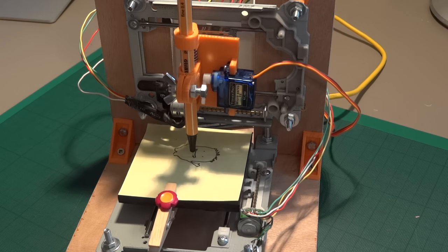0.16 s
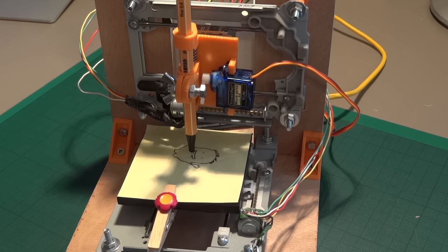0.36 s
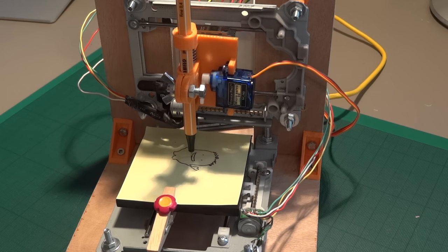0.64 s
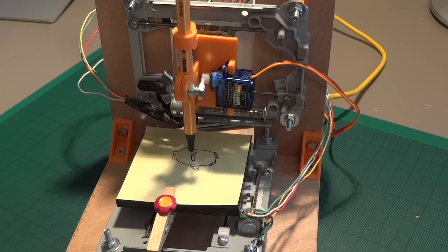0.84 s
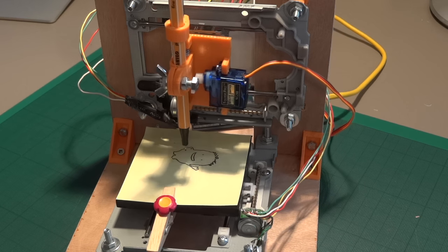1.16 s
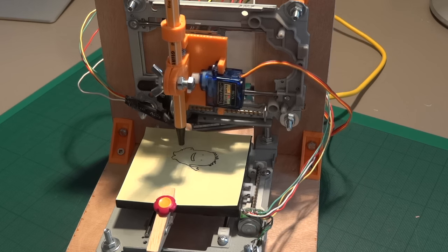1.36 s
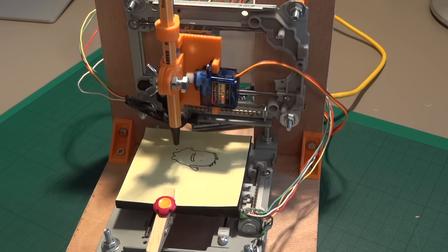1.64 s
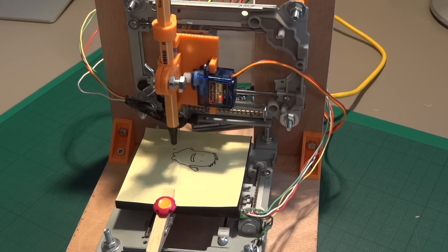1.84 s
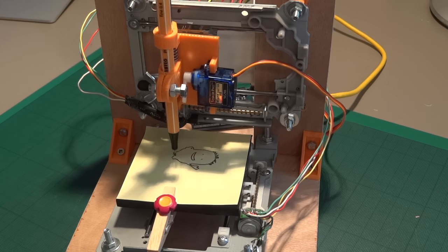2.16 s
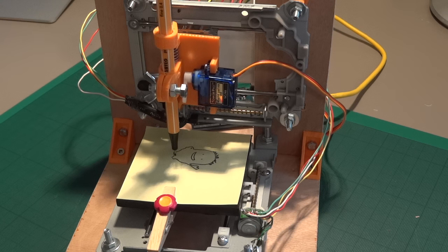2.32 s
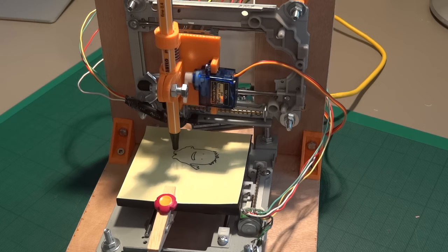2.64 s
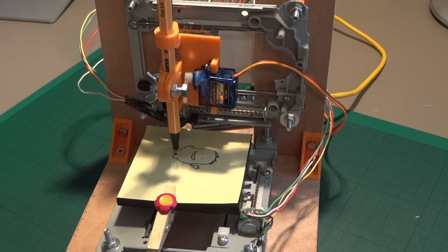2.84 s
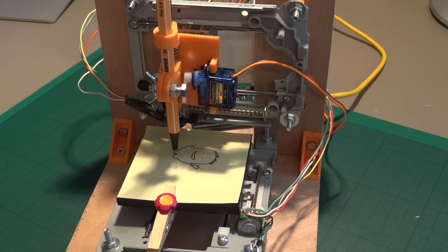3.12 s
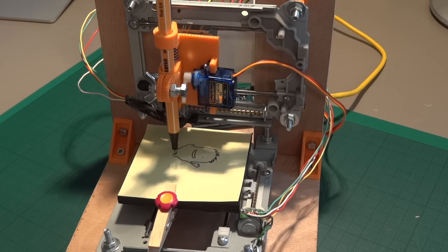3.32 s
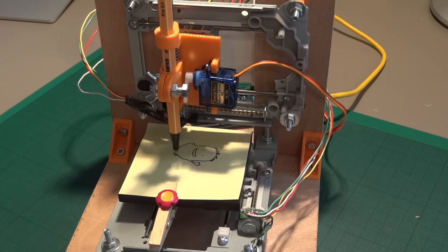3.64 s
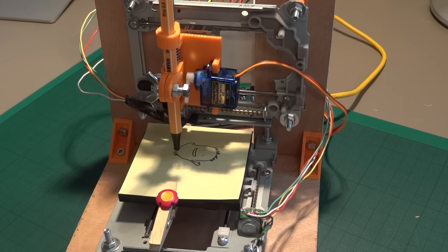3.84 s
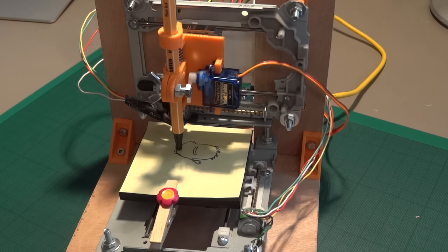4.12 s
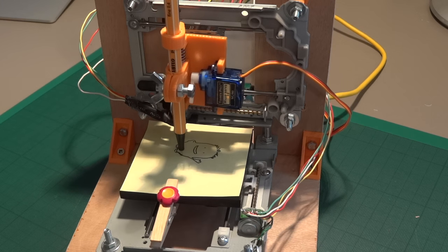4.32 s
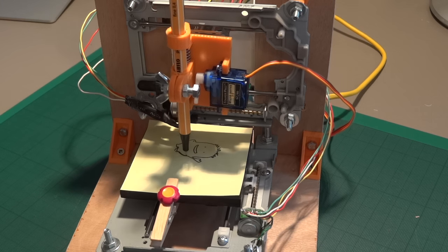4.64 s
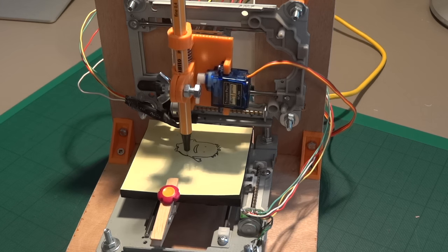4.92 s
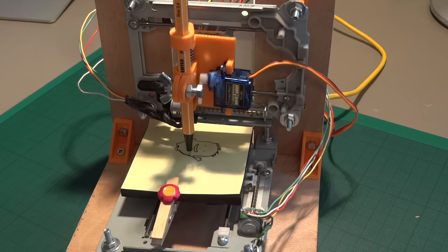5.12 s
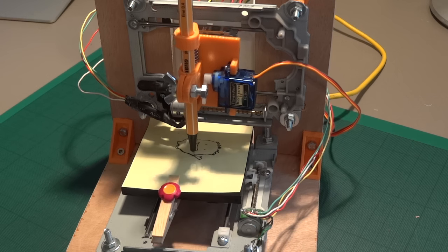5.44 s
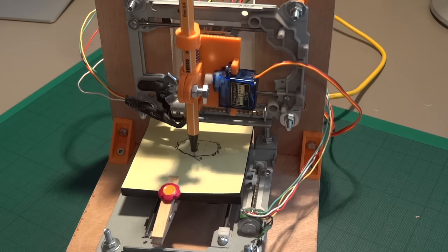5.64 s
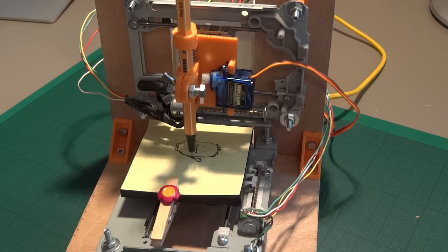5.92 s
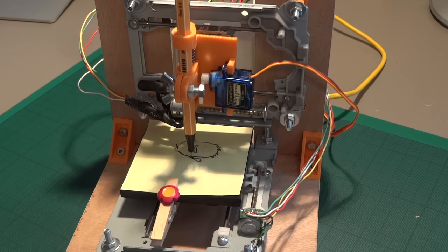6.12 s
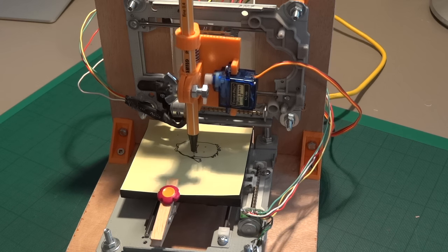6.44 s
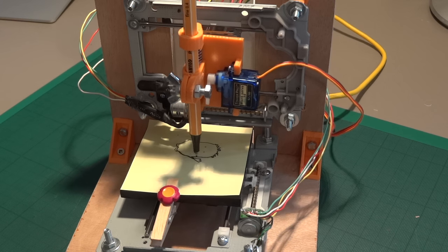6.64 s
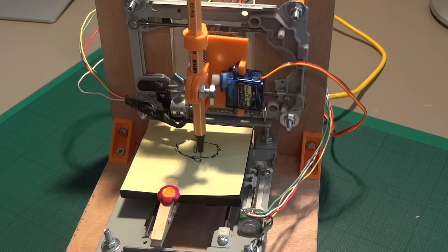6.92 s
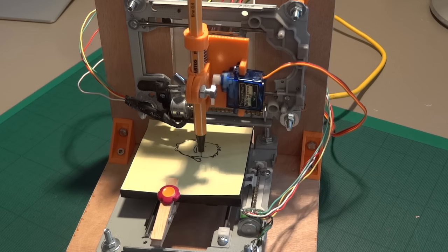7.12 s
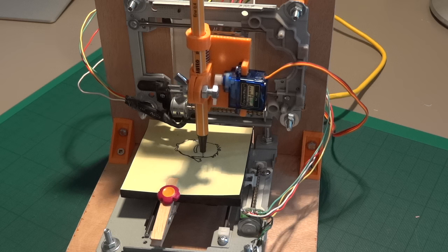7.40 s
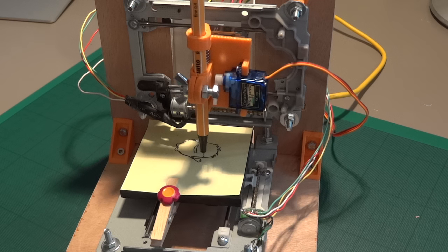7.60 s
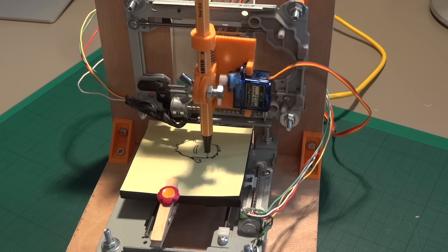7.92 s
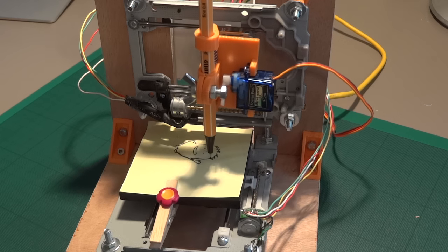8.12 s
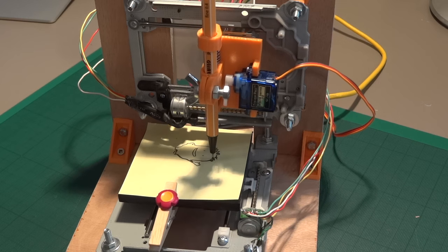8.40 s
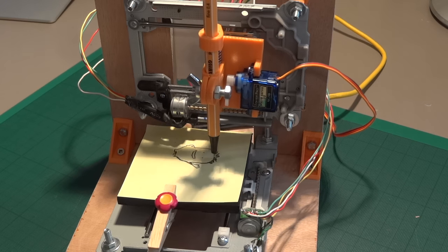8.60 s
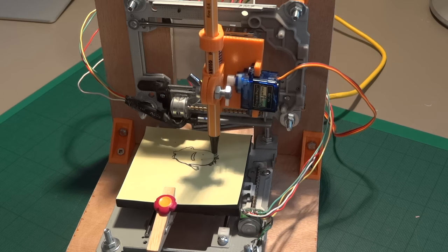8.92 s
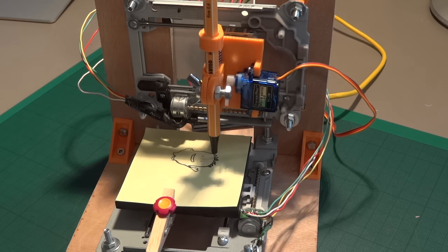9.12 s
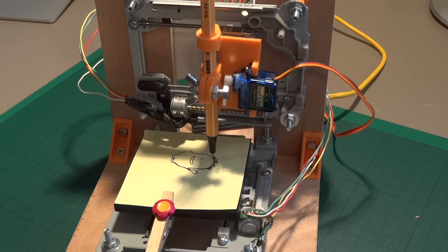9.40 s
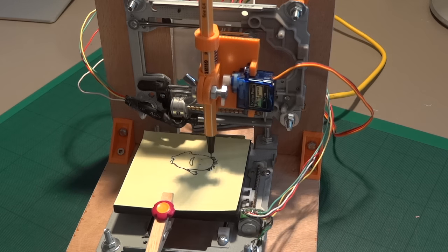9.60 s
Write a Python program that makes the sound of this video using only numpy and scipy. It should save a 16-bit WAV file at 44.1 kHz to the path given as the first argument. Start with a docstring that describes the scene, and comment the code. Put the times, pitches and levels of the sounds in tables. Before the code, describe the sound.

A small homemade pen plotter draws on a desk in a small room, heard from close in front. From the start, its stepper motors move in short, irregular buzzing runs of very fast ticks, with a slight hum and sharp little knocks from the loose slides. At about 0.8 seconds a small geared servo gives a brief, high whine as it lifts the pen. The bed travels with a soft low thrum and scattered clicks until about 1.9 seconds, when the servo lowers the pen with a short rasping whirr. The stop-start runs continue and are hardest and most rattly from about 4 to 7 seconds. A few longer runs follow around 8 seconds, then they ease off until the end, near 10 seconds. Throughout, the servo ticks faintly and rapidly over quiet room tone.

```python
"""A small homemade pen plotter draws on a desk in a small room, the microphone close in front of it.
From the start two stepper slides move in short runs: each step jolts base, frame, slider and screw nut,
and play in the slides adds knocks. Just before 1 s a small geared servo whines and lifts the pen; the bed
travels with a low thrum, and near 2 s the servo sets the pen down. The runs are hardest from 4 to 7 s
and ease off toward the end. All along the servo ticks faintly over the still air of the room."""
import sys
import numpy as np
from scipy import signal
from scipy.fft import rfft, irfft
from scipy.io import wavfile

SR = 44100
rng = np.random.default_rng(int(sys.argv[2]) if len(sys.argv) > 2 else 0)


def log_audio(samples):
    """Write samples as a 16-bit WAV file to the path given in sys.argv[1]."""
    # one column per channel
    frames = np.atleast_2d(samples).T
    # limit to full scale, then quantise
    limited = np.clip(frames, -1, 1)
    pcm = np.round(limited * 32767).astype(np.int16)
    wavfile.write(sys.argv[1], SR, pcm)


N = 430416
STEP_HZ, USUAL_FORCE_DB = 166.8, -46.5

# resonances of the base and of the frame: pitch_hz, width_hz, level_db
BASE_MODES = [(125, 30, -3), (170, 35, -7), (252, 30, -5), (335, 45, -6), (400, 70, -4), (490, 60, -4),
              (700, 90, -1), (830, 80, -9), (900, 80, -12)]
FRAME_MODES = [(1130, 70, -11), (1240, 50, -7), (1313, 36, 3), (1365, 40, -3), (1430, 22, -4),
               (1580, 100, -10), (2080, 110, -8), (2290, 100, -15)]
# resonances of slider and nut at five places along the rail: pitch_hz, width_hz, level_db
RAIL_FAR_LEFT = [(2600, 200, -10), (3100, 200, -6), (4000, 170, -4), (4950, 200, -5), (5400, 150, 5),
                 (6500, 400, -9), (8200, 500, -11), (9500, 300, -13), (10600, 300, -12)]
RAIL_LEFT = [(2450, 130, -7), (2630, 130, -5), (2900, 110, -3), (3160, 170, 0), (3780, 110, -6),
             (4120, 180, -5), (4930, 200, 3), (5230, 240, 1), (5750, 300, -11), (6350, 350, -8),
             (7560, 200, -13), (8790, 150, -13), (9470, 200, -7), (10600, 300, -9)]
RAIL_MIDDLE = [(2440, 80, -10), (2630, 70, -9), (2890, 80, -7), (3220, 130, 2), (3800, 110, 1),
               (4070, 140, 4), (4440, 100, -8), (4860, 170, -1), (5380, 200, 0), (6550, 300, 0),
               (7340, 200, -11), (8800, 150, -12), (9480, 220, -4), (10600, 300, -5)]
RAIL_RIGHT = [(2400, 160, -9), (2620, 95, -2), (2970, 500, 16), (3240, 340, 7), (3630, 110, 2),
              (3970, 180, -11), (5000, 180, -6), (5420, 300, 3.5), (6550, 380, 6), (7600, 390, -0.5),
              (9100, 590, -0.5), (10000, 210, -18), (10300, 360, -9)]
RAIL_FAR_RIGHT = [(2470, 100, -9), (2630, 180, 1), (3040, 200, 4), (3280, 120, -9), (3900, 220, -10),
                  (5080, 210, 1), (5470, 360, 3), (6500, 400, -13), (7760, 400, -13), (8900, 680, -13),
                  (10200, 230, -27)]
# where the carriage stands: start_s, resonances
CARRIAGE_PLACES = [ (0, RAIL_LEFT), (1.02, RAIL_FAR_LEFT), (1.9, RAIL_LEFT), (6.1, RAIL_MIDDLE),
                   (7.93, RAIL_RIGHT), (8.69, RAIL_FAR_RIGHT)]
def slides(base_db, frame_db, slider_db, nut_db, knock_db, loose):
    """Right at the microphone, steps ring base, frame, slider and nut; knocks ring all but the base."""
    step_s, base_sizes, *step_sizes = steps(limp_db=1.1, shared_db=.8, own_db=1, jitter_s=.0002)
    knock_s, knock_sizes = knocks(slider_db=-.5, nut_db=.3, bounce_s=.0027, bounce_db=-7)
    times = np.concatenate([step_s, knock_s])
    frame_sizes, slider_sizes, nut_sizes = np.hstack([step_sizes, from_db(knock_db) * knock_sizes])
    base_jolts = jolts(step_s, base_sizes, loose=1, chatter_s=.0043)
    base_ring = body(BASE_MODES, 176, 2100, dense_db=-11, dense_t60=.039)
    frame_jolts = jolts(times, frame_sizes, loose, chatter_s=.003)
    frame_ring = body(FRAME_MODES, 1210, 3640, dense_db=-14, dense_t60=.025)
    sound = from_db(base_db) * through(base_jolts, base_ring)
    sound += from_db(frame_db) * through(frame_jolts, frame_ring)
    place = np.searchsorted([start for start, _ in CARRIAGE_PLACES], times, "right") - 1
    for k, (_, modes) in enumerate(CARRIAGE_PLACES):
        here = place == k
        slider_ring = body([m for m in modes if m[0] < 4600], 2140, 5300, dense_db=-14, dense_t60=.043)
        nut_ring = body([m for m in modes if m[0] >= 4600], 4720, 10840, dense_db=-14, dense_t60=.075)
        slider_jolts = jolts(times[here], slider_sizes[here], loose, chatter_s=.0025)
        nut_jolts = jolts(times[here], nut_sizes[here], loose, chatter_s=.0017)
        sound += from_db(slider_db) * through(slider_jolts, slider_ring)
        sound += from_db(nut_db) * through(nut_jolts, nut_ring)
    return sound


# short buzzing runs of motor steps, with the pen down or lifted: start_s, end_s, force_db
MOVES = [(.008, 0.08, -44), (.15, 0.251, -56.5), (.318, .44, -57.5), (0.502, 0.668, -66),
         (0.883, 0.999, -45), (1.07, 1.095, -58), (1.172, 1.21, -69), (1.268, 1.292, -48.5),
         (1.344, 1.364, -60), (1.45, 1.474, -55), (1.532, 1.555, -57), (1.738, 1.761, -52),
         (2.013, 2.144, -44.5), (2.226, 2.245, -44.5), (2.309, 2.322, -47.5), (2.395, 2.43, -54),
         (2.486, 2.507, -65), (2.58, 2.627, -53), (2.694, 2.731, -56.5), (2.777, 2.798, -85),
         (2.895, 2.909, -51.5), (2.982, 3.016, -52), (3.072, 3.078, -57), (3.158, 3.22, -47),
         (3.235, 3.295, -48), (3.356, 3.487, -48.5), (3.544, 3.574, -49), (3.642, 3.702, -46.5),
         (3.758, 3.807, -40), (3.876, 3.89, -45), (3.982, 4.078, -37), (4.158, 4.278, -40),
         (4.351, 4.495, -41), (4.57, 4.706, -43), (4.778, 4.806, -55), (4.879, 4.906, -42.5),
         (4.981, 5.078, -40.5), (5.145, 5.36, -40), (5.42, 5.466, -42.5), (5.525, 5.555, -41.5),
         (5.635, 5.671, -44.5), (5.745, 5.821, -49.5), (5.895, 6.003, -50), (6.171, 6.181, -47.5),
         (6.259, 6.343, -43.5), (6.425, 6.437, -46), (6.446, 6.637, -42.5), (6.708, 6.724, -53.5),
         (6.737, 6.934, -43), (7.092, 7.139, -52), (7.198, 7.251, -55.5), (7.32, 7.354, -50),
         (7.41, 7.46, -54), (7.502, 7.538, -57), (7.596, 7.622, -59), (7.696, 7.897, -45),
         (7.959, 8.137, -46), (8.231, 8.381, -45), (8.468, 8.648, -49), (8.716, 8.869, -54.5),
         (8.933, 9.081, -59.5), (9.137, 9.275, -61), (9.343, 9.448, -62), (9.524, 9.619, -60),
         (9.703, 9.76, -59.5)]
# swing between alternate steps in slider and nut, changing along the screw: time_s, swing_db
SCREW_LIMP = [(0, 5.5), (3, 1.5), (4.2, 1.6), (5.3, -0.5), (5.9, 0.5), (6.5, 2), (7, -2), (7.8, 6.5),
              (8.3, 6.5), (9.7, 1)]
def steps(limp_db, shared_db, own_db, jitter_s, slack_steps=3, slack_db=-14, catch_chance=.16):
    """Step times and sizes in the four parts; strong and weak alternate, and a few catch on the screw."""
    runs, max_steps = [], 64
    for start, end, move_db in MOVES:
        k = np.arange(-slack_steps, int(np.ceil((end - start) * STEP_HZ)))
        late, shared_scatter, *own_scatter = rng.standard_normal((6, max_steps))[:, :len(k)]
        catches = (rng.random(max_steps)[:len(k)] < catch_chance) & (k > 2)
        catch_db = max(4 + .55 * (USUAL_FORCE_DB - move_db), 0)   # a light load catches harder
        screw_db = catches * catch_db + at_times(SCREW_LIMP, start)[0] * (-1.) ** k
        settle_db = -2 * np.exp(-np.maximum(k, 0) / STEP_HZ / .0076)   # the nut settles on the screw
        step_db = limp_db * (-1.) ** k + shared_db * shared_scatter + settle_db
        grip = from_db(slack_db * (k < 0))   # the first steps only take up slack
        levels = part_levels((start + end) / 2, move_db)
        sizes = [grip * from_db(db) * rms_one(from_db(step_db + own_db * scatter + extra_db))
                 for db, scatter, extra_db in zip(levels, own_scatter, (0, 0, screw_db, screw_db))]
        times = start + k / STEP_HZ + jitter_s * late
        runs.append(np.vstack([times] + sizes))
    return np.hstack(runs)


# how base, frame, slider and nut answer to force: usual_level_db, slope_db_per_db
FORCE_RESPONSE = [(-54.5, 0.34), (-47, 0.32), (-46.5, 0.83), (-47.5, 1.086)]
# level shifts as the slides travel: time_s, base_db, frame_db, nut_db
TRAVEL_COLOUR = [(0, 4, -1, 3.5), (.6, 1.5, 2, 3.5), (1.3, -3, -2.5, -5.5), (2.1, 0, 3, -4),
                 (2.4, -2.5, -0.5, 1.5), (3.4, 0, 2, -0.5), (4.2, 3, 2, -1), (4.7, 1.5, -2, 0.5),
                 (5.3, 2, 1.5, -1), (5.9, 4.5, -1, 2), (6.2, 0, -3.5, -2), (7.5, -0.5, -0.5, 4),
                 (7.8, 2, 0.5, 3.5), (8.3, 2.5, 2, -2.5), (8.8, -4.5, 1, -2.5), (9.2, -1.5, 0, -0.5),
                 (9.5, 6, 0, -3)]
def part_levels(time_s, force_db):
    """Levels of the four parts; slider and nut gain most from force, so a harder step is brighter."""
    base, frame, slider, nut = [db + slope * (force_db - USUAL_FORCE_DB) for db, slope in FORCE_RESPONSE]
    base_db, frame_db, nut_db = at_times(TRAVEL_COLOUR, time_s)
    return base + base_db, frame + frame_db, slider, nut + nut_db


# the loudest knocks: time_s, level_db, frame_share_db
KNOCKS = [(.037, -35.5, -1.5), (.043, -36.5, -7), (0.226, -43, -15), (0.242, -40.5, -10), (0.432, -45, -18),
          (.881, -33.5, -13), (1.079, -41.5, 0.5), (1.175, -42.5, 1.5), (1.194, -41, -15), (1.272, -40, 0),
          (1.452, -40.5, 5), (1.53, -42, -14), (1.644, -39.5, 3), (1.697, -37, -9), (1.746, -38, -14),
          (1.825, -41, -3), (2.236, -38.5, 3), (2.402, -42.5, -9), (3.006, -41, -15), (3.191, -34, -4),
          (3.361, -40, -14), (3.466, -36.5, 0), (3.563, -35, -1), (3.571, -37.5, -8), (3.682, -34, -9),
          (3.8, -37, 7), (3.884, -34.5, -2), (4.011, -35, -4), (4.051, -29.5, -12), (4.185, -31.5, -7),
          (4.228, -33, 0), (4.267, -34, -1.5), (4.401, -33, -2), (4.462, -32, -3), (4.486, -35, -1),
          (4.574, -39, -14), (4.785, -42.5, -10), (5.026, -34, -9), (5.055, -36, 2.5), (5.145, -46, -14),
          (5.159, -32.5, -2), (5.209, -31.5, -3), (5.262, -33, -2), (5.281, -33.5, -0.5), (5.307, -38, -6),
          (5.328, -31.5, -3.5), (5.635, -45, 7), (5.792, -39, -5), (5.968, -37.5, -16), (6.266, -33.5, -12),
          (7.223, -39, -8), (7.61, -43.5, -6), (8.028, -39, 0), (8.095, -40.5, -4), (8.131, -38, 2),
          (8.242, -37.5, -7), (8.302, -33.5, -6), (8.362, -36, -12), (8.519, -36.5, 1.5), (8.577, -42, 3.5),
          (8.615, -37, 3.5), (8.831, -42, 5), (8.855, -40.5, 2.5), (9.05, -45, 8.5), (9.169, -46, 11.5),
          (9.217, -46, 6), (9.435, -48, 5.5), (9.556, -48.5, 5.5), (9.744, -43, -10)]
def knocks(slider_db, nut_db, bounce_s, bounce_db):
    """A slide takes up its play, knocks and bounces once: times, and sizes in frame, slider and nut."""
    times, db, frame_share_db = np.transpose(KNOCKS)
    nut_colour_db = at_times(TRAVEL_COLOUR, times)[-1]
    sizes = from_db([db + frame_share_db, db + slider_db, db + nut_db + nut_colour_db])
    return np.concatenate([times, times + bounce_s]), np.hstack([sizes, from_db(bounce_db) * sizes])


# the servo lifting and lowering the pen: time_s, mesh_hz, level_db
PEN_UP = [(.748, 1700, -71), (.757, 1746, -43.5), (.80, 1944, -41), (.84, 2003, -37), (.873, 2103, -39),
          (.888, 2417, -27.5), (.908, 2216, -26), (.932, 1803, -23), (.955, 1545, -33.5), (.98, 1370, -39),
          (1.01, 1220, -65)]
PEN_DOWN = [(1.908, 1110, -59), (1.92, 1350, -35), (1.936, 1700, -24), (1.955, 1694, -22.5),
            (1.982, 2140, -24.5), (2.012, 2090, -36), (2.06, 2020, -36.5), (2.11, 2060, -43.5),
            (2.148, 2000, -45.5), (2.165, 1780, -69)]
# resonances of the servo's case: pitch_hz, width_hz, level_db
CASE_MODES = [(2800, 250, -16), (3150, 220, -15), (4250, 250, -18), (4850, 250, -14), (5500, 250, -7),
              (6500, 280, 0), (6900, 380, 0), (8250, 450, -5), (8750, 350, -9), (9400, 350, -8),
              (10300, 450, -6), (10850, 300, -8)]
def servo(motion, whine_db, whine_slope, clash_db, clashes_per_s, low_cut_hz):
    """Gear teeth whine at multiples of the mesh rate, scrape, and clash at random in the plastic case."""
    times, mesh_hz, level_db = np.transpose(motion)
    t = np.arange(N) / SR
    envelope_db = np.interp(t, times, level_db, left=-120, right=-120)
    phase = 2 * np.pi * np.cumsum(np.interp(t, times, mesh_hz)) / SR
    phase += .3 * rms_one(band(rng.standard_normal(N), 20, 250))   # roughens the whine
    whine = rms_one(sum(gain * np.sin(k * phase) for k, gain in [(2, .41), (3, .96), (4, 1.4), (5, .2)]))
    clash_s = np.sort(rng.uniform(0, N / SR, int(clashes_per_s * N / SR)))
    clashes = rms_one(jolts(clash_s, rng.uniform(.4, 1, len(clash_s)), loose=.92, chatter_s=.00088))
    case = body(CASE_MODES, 2600, 14000, dense_db=-13, dense_t60=.01)
    scrape = rng.standard_normal(N)
    rasp = rms_one(band(through(scrape + from_db(clash_db) * clashes, case), low_cut_hz, 20000))
    whine_gain = from_db(whine_db + whine_slope * (envelope_db - envelope_db.max()))
    return from_db(envelope_db) * (rasp + whine_gain * whine) / np.hypot(1, whine_gain)


# resonances of the bed: pitch_hz, width_hz, level_db
BED_MODES = [(118.5, 30, -2.5), (166, 21, -12), (390, 28, -9), (827, 40, -5), (895, 38, -4.5),
             (1350, 86, 1)]
def bed_travel(start_s, end_s, thrum_hz, thrum_db, rattle_db):
    """With the pen up the bed runs steadily: a low thrum, and a soft rattle on each of its cycles."""
    t = np.arange(N) / SR
    running = np.clip(np.minimum(t - start_s, end_s - t) / .027, 0, 1)
    times = np.arange(start_s, end_s, 1 / thrum_hz)
    shaking = jolts(times, np.ones(len(times)), loose=.72, chatter_s=.0025)
    rattle = through(shaking, body(BED_MODES, 120, 2700, dense_db=-1, dense_t60=.056))
    thrum = rms_one(np.sin(2 * np.pi * thrum_hz * t))
    return from_db(thrum_db) * running * thrum + from_db(rattle_db) * np.sqrt(SR / thrum_hz) * rattle


# harmonics of the hum as the slides travel: time_s, first_db, second_db, third_db
HUM_HARMONICS = [(0, -11, -11, 1), (3, -11, -3, -21), (4.5, -10.5, -12, -6.5), (5.9, -12, -10, 5.5),
                 (6.4, -5, 1, -2), (8.2, -12, -4.5, -24.5), (8.8, -12, 1.5, 4), (9.5, -12, 3, 9.5)]
def coil_hum(hum_db, fade_s, waver_rad):
    """While a motor runs its coils hum through the base, on multiples of half the step rate."""
    t = np.arange(N) / SR
    running = np.zeros(N)
    for start, end, move_db in MOVES:
        base_db = part_levels((start + end) / 2, move_db)[0]
        running[int(start * SR):int(end * SR)] = from_db(base_db + hum_db)
    pole = np.exp(-1 / (fade_s * SR))
    envelope = signal.lfilter([1 - pole], [1, -pole], running)
    phase = np.pi * STEP_HZ * t + waver_rad * rms_one(band(rng.standard_normal(N), 2.2, 30))
    hum = sum(from_db(db) * np.sin(k * phase) for k, db in enumerate(at_times(HUM_HARMONICS, t), 1))
    return envelope * hum


# the two edges of the servo's control pulse within a period: offset_s, level_db
PULSE_EDGES = [(.0067, -59), (.0084, -38)]
# ring of a tick: pitch_hz, width_hz, level_db
TICK_MODES = [(3340, 1400, -3), (5300, 980, -14), (10100, 1100, 0.5)]
def servo_ticks(control_hz, uneven_db):
    """The servo ticks faintly at both edges of each control pulse, even at rest."""
    pulse_s = np.arange(0, N / SR - 1 / control_hz, 1 / control_hz)
    wobble_db = uneven_db * rng.standard_normal(len(pulse_s))
    times, db = np.hstack([[pulse_s + offset_s, edge_db + wobble_db] for offset_s, edge_db in PULSE_EDGES])
    ticks = jolts(times, from_db(db), loose=.63, chatter_s=.00028)
    return through(ticks, body(TICK_MODES, 3000, 8000, dense_db=-39, dense_t60=.0042))


def room(sound):
    """The small room's diffuse tail, shorter in the treble, reaches the microphone 5 ms late."""
    low_tail = from_db(-9) * band(dying_noise(t60=.5), 85, 2430)
    high_tail = from_db(-12) * band(dying_noise(t60=.28), 2570, 10300)
    return through(sound, np.concatenate([np.zeros(SR // 200), low_tail + high_tail]))


# spectrum of the still room: frequency_hz, density_db
ROOM_TONE = [(24, -39), (40, -9), (207, -2), (373, -2.5), (531, -1.5), (597, -2), (720, -4.5), (1760, -5),
             (2690, -5.5), (3400, -8.5), (4100, -9), (5700, -12), (9110, -14.5), (10300, -13), (11000, -22),
             (14300, -49), (22000, -120)]
def air():
    """Steady room tone all around the microphone."""
    hz, db = np.transpose(ROOM_TONE)
    gain = from_db(np.interp(np.log(np.fft.rfftfreq(N, 1 / SR) + 1), np.log(hz), db))
    noise = irfft(rfft(rng.standard_normal(N)) * gain, N)
    return rms_one(band(noise, 94, 18000))


def jolts(times, sizes, loose, chatter_s):
    """Clicks plus a chatter of loose contacts that swells and dies; loose is its share of the energy."""
    clicks = np.zeros(N)
    np.add.at(clicks, np.clip((times * SR).astype(int), 0, N - 1), sizes)
    pole = np.exp(-2 / (chatter_s * SR))
    power = signal.lfilter([(1 - pole) ** 2], [1, -2 * pole, pole * pole], clicks ** 2 + 1e-24)
    return np.sqrt(1 - loose) * clicks + np.sqrt(loose * power) * rng.standard_normal(N)


def body(modes, low_hz, high_hz, dense_db, dense_t60):
    """Impulse response of a part: its main resonances over many weak, quickly damped ones."""
    t = np.arange(SR // 2) / SR
    rings = sum(from_db(db) * width * np.exp(-np.pi * width * t) * np.cos(2 * np.pi * hz * t)
                for hz, width, db in modes)
    dense = unit(band(dying_noise(dense_t60), low_hz, high_hz, order=4))
    return unit(unit(band(rings, low_hz, high_hz)) + from_db(dense_db) * dense)


def dying_noise(t60):
    """Noise that fades by 60 dB in t60 seconds; energy one."""
    t = np.arange(SR // 2) / SR
    return unit(rng.standard_normal(len(t)) * np.exp(-np.log(1000) * t / t60))


def through(x, response):
    """Pass a sound through an impulse response."""
    return signal.oaconvolve(x, response)[:N]


def band(x, low_hz, high_hz, order=2):
    """Causal band-pass."""
    sos = signal.butter(order, [low_hz, min(high_hz, .45 * SR)], "band", fs=SR, output="sos")
    return signal.sosfilt(sos, x)


def at_times(curve, times):
    """Read the columns of a curve at the given times."""
    curve_s, *columns = np.transpose(curve)
    return [np.interp(times, curve_s, column) for column in columns]


def from_db(db):
    """Decibels to gain."""
    return 10 ** (np.asarray(db) / 20)


def unit(x):
    """Scale to an energy of one."""
    return x / np.sqrt(np.sum(x ** 2) + 1e-20)


def rms_one(x):
    """Scale to an rms of one."""
    return unit(x) * np.sqrt(len(x))


def scene():
    """The plotter stands close, straight ahead; only the room's midrange differs from left to right."""
    plotter = slides(base_db=-1, frame_db=-1, slider_db=.6, nut_db=.1, knock_db=-2, loose=.74)
    plotter *= np.sqrt(SR / STEP_HZ)   # makes up for one jolt's energy spreading over a whole step
    plotter += servo(PEN_UP, whine_db=2, whine_slope=.25, clash_db=0, clashes_per_s=790, low_cut_hz=2000)
    plotter += servo(PEN_DOWN, whine_db=-18, whine_slope=-.4,
                     clash_db=-3, clashes_per_s=180, low_cut_hz=3800)
    plotter += servo_ticks(control_hz=49.976, uneven_db=2.5)
    plotter += bed_travel(start_s=.98, end_s=1.86, thrum_hz=82.3, thrum_db=-71, rattle_db=-56)
    plotter += coil_hum(hum_db=-10, fade_s=.022, waver_rad=.17)
    room_mid, room_side = [room(plotter) + from_db(-57.5) * air() for _ in range(2)]
    mid = plotter + room_mid
    side = band(room_side, 330, 1720, order=1)
    return np.array([mid + side, mid - side])


def record(dry):
    """The stereo microphone's signal is cut steeply above 11150 Hz."""
    return signal.sosfilt(signal.ellip(12, .1, 80, 11150, fs=SR, output="sos"), dry)


dry = scene()
out = record(dry)
log_audio(out)
```